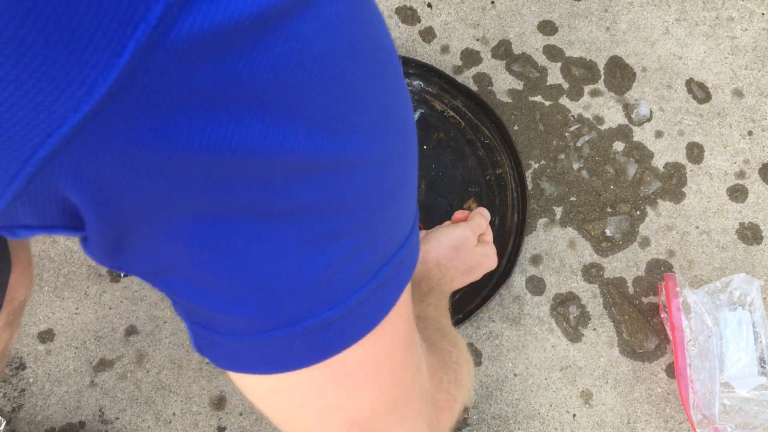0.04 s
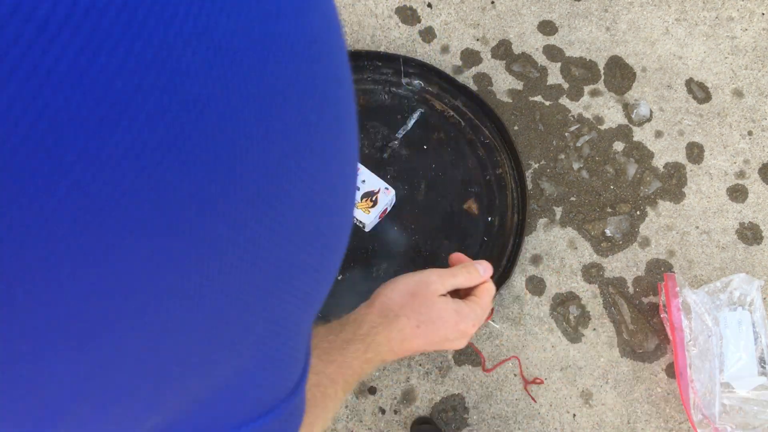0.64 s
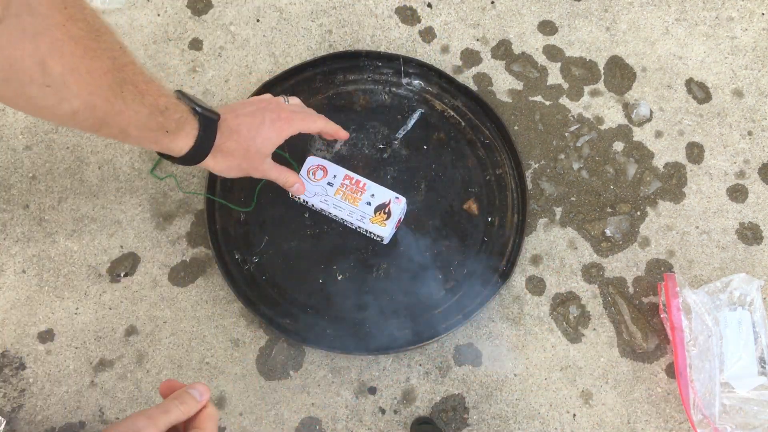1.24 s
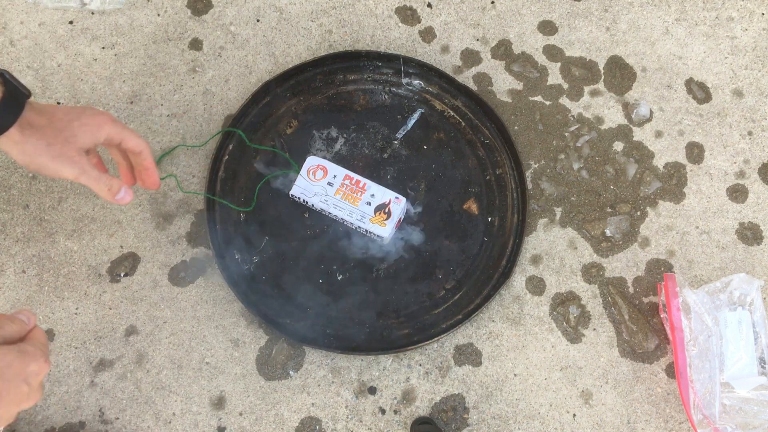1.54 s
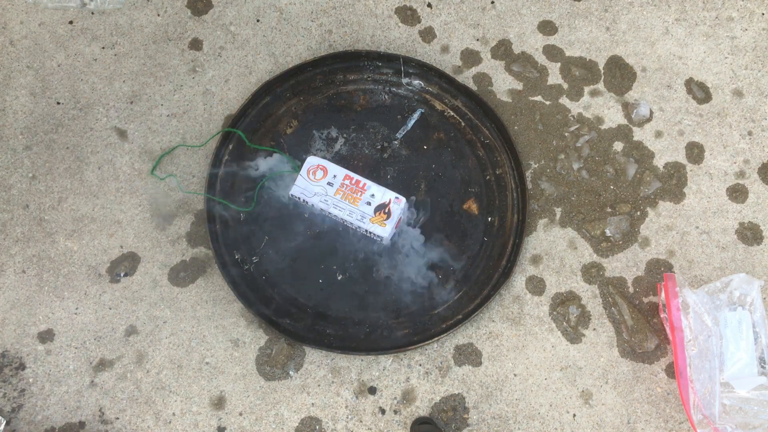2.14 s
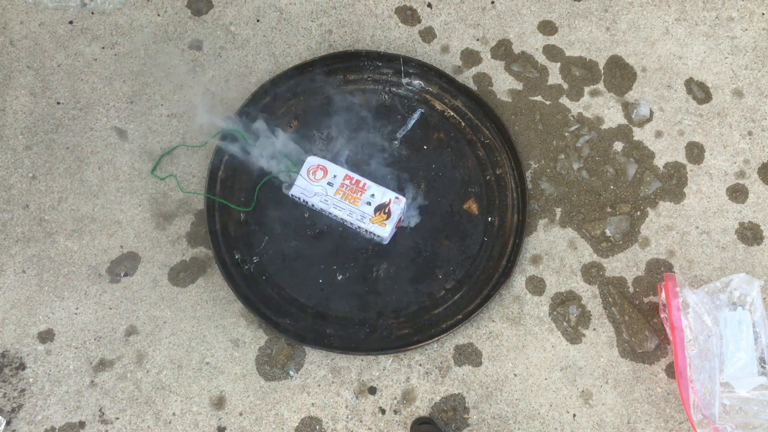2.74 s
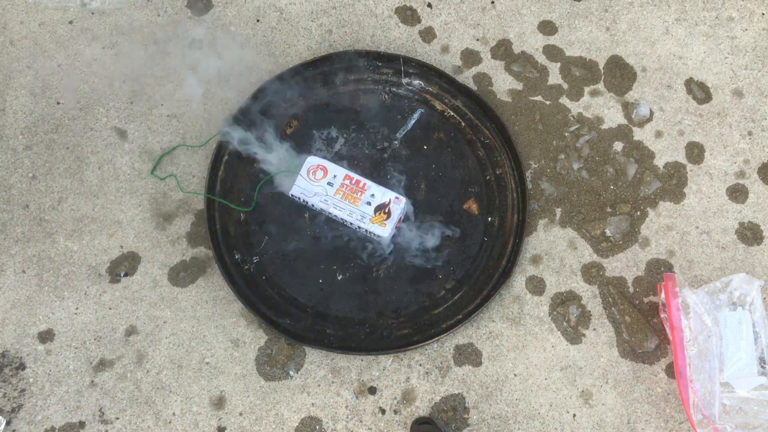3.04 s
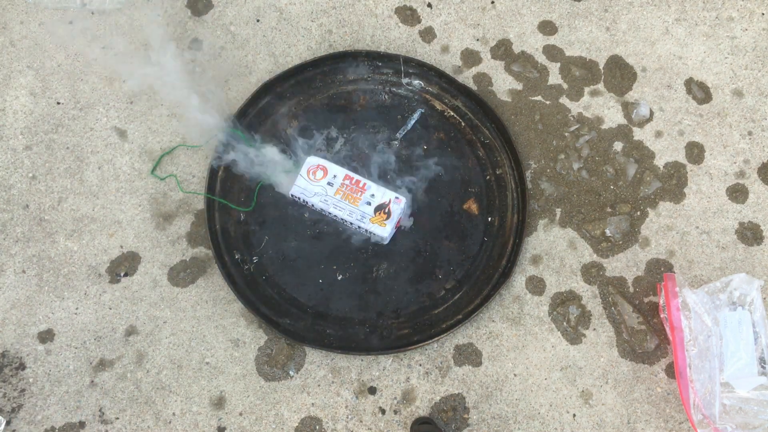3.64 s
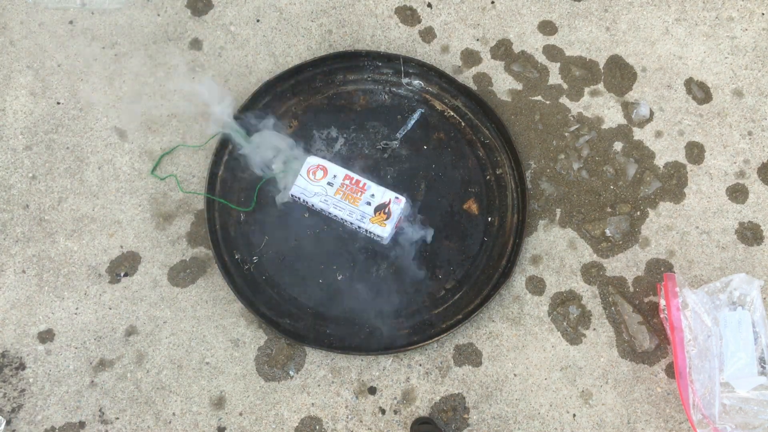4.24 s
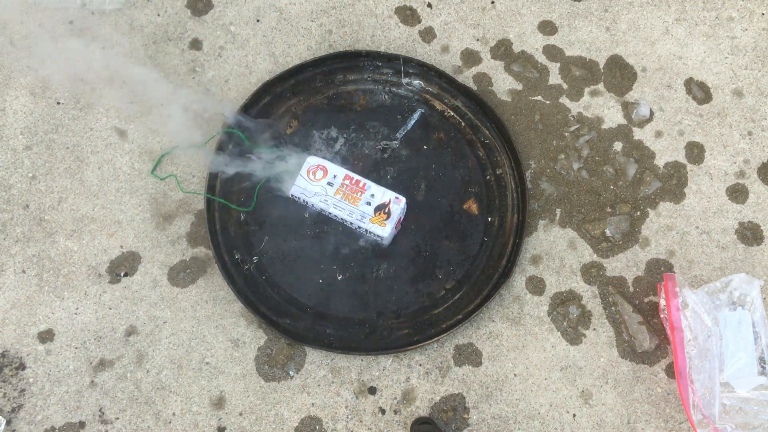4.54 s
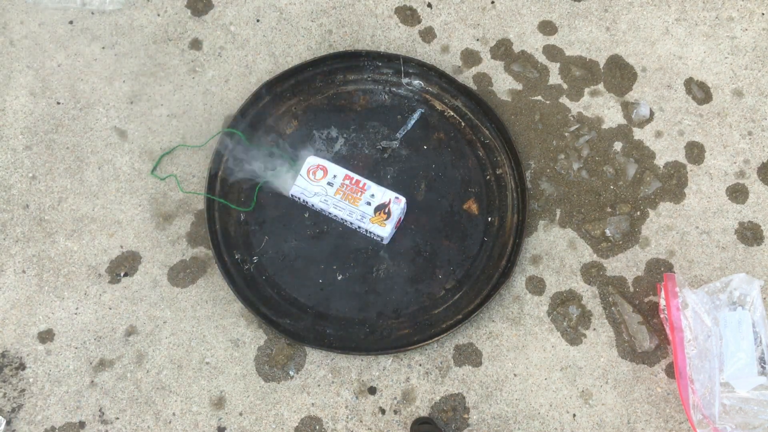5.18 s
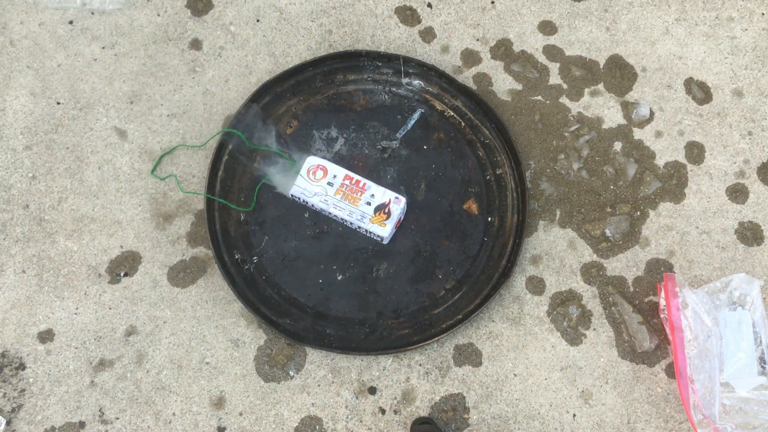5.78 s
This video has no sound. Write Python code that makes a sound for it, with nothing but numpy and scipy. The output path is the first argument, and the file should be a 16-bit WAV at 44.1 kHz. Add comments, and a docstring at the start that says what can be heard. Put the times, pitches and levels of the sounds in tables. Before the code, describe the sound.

A sleeve brushes by as a cord is pulled and a firestarter ignites with a sharp double snap. A bright, sputtering fizz follows for about a second, with light knocks on a steel tray. It gives way to a quieter, duller jet of smoke that hisses for several seconds and dies in a few tiny ticks. Outdoor air softly buffets the close microphone, and a far engine hums faintly at the end.

```python
"""A pull-cord firestarter

Outdoors, on a steel tray, a cord rips the igniter with a sharp double snap. The primer (the starter
charge) fizzes for a second while the box is set straight. Then the block blows a duller jet of smoke
that dies away in a few ticks. Air buffets the microphone, and near the end an engine hums far off."""
import sys
import numpy as np
from scipy import signal
from scipy.fft import rfft, irfft, next_fast_len
from scipy.io import wavfile
from scipy.ndimage import uniform_filter1d, map_coordinates

SR = 44100
rng = np.random.default_rng(int(sys.argv[2]) if len(sys.argv) > 2 else 0)


def unload_wav(signal):
    """Save mono or channel-first audio to the path in sys.argv[1] as 16-bit WAV at rate SR, clipped to [-1, 1]."""
    wavfile.write(
        sys.argv[1],
        SR,
        np.round(np.clip(np.atleast_2d(signal).T, -1, 1) * 32767).astype(np.int16),
    )


N = 265173
TIME = np.arange(N) / SR


def amp(db):
    """Turn decibels into a number to multiply by."""
    return 10 ** (np.asarray(db) / 20)


def unit(x):
    """Scale a signal to an average power of 1."""
    return x / np.sqrt(np.mean(x ** 2) + 1e-20)


def along(points, hz):
    """Read the level in dB at any pitch from a table; it falls steeply past both ends."""
    pitches, levels = np.transpose(points)
    octave, known = np.log2(hz + 1), np.log2(pitches)
    beyond = np.maximum(known[0] - octave, 0) + np.maximum(octave - known[-1], 0)
    return np.interp(octave, known, levels) - 24 * beyond


def curves(rows):
    """Join the rows with straight lines: one curve for each column after the time."""
    times, *columns = np.transpose(rows)
    return [np.interp(TIME, times, column) for column in columns]


def gate(start, end, rise, fall):
    """Fade in from start and out towards end, all in seconds."""
    return np.clip((TIME - start) / rise, 0, 1) * np.clip((end - TIME) / fall, 0, 1)


def swell(s, half):
    """A smooth bump of height 1 around time s."""
    return np.exp(-.5 * ((TIME - s) / half) ** 2)


def after(s):
    """Seconds since time s, 0 before it."""
    return np.maximum(TIME - s, 0)


def wobble(rate):
    """A smooth curve through `rate` random values a second."""
    return map_coordinates(rng.standard_normal(int(N * rate / SR) + 4), [TIME * rate])


def filtered(x, response):
    """Multiply each pitch in x by response(hz)."""
    size = next_fast_len(N + 8192)
    return irfft(rfft(x, size) * response(np.fft.rfftfreq(size, 1 / SR)), size)[:N]


def peak(hz, centre_hz, width_hz, boost_db):
    """The dB added by a resonance: a band of pitches that rings louder than the rest."""
    return boost_db / (1 + (2 * (hz - centre_hz) / width_hz) ** 2)


def noise(tone, rings=(), grain=0):
    """Noise shaped by a tone table and resonances; grain turns it into tiny uneven pops."""
    source = rng.standard_normal(N) * np.exp(grain * rng.standard_normal(N))
    return unit(filtered(source, lambda hz: amp(along(tone, hz) + sum(peak(hz, *r) for r in rings))))


def resonate(x, centre_hz, width_hz, boost_db):
    """A moving resonance that colours the sound without adding power."""
    hz, times, bands = signal.stft(x, SR, nperseg=1024)
    controls = [np.interp(times, TIME, c + np.zeros(N)) for c in (centre_hz, width_hz, boost_db)]
    gain = amp(peak(hz[:, None], *controls))
    power = np.mean(np.abs(bands) ** 2, axis=1)
    gain /= np.sqrt(power @ gain ** 2 / power.sum())
    return unit(signal.istft(bands * gain, nperseg=1024)[1][:N])


def drifting(x, depth_db):
    """Narrow bands of pitch slowly swell and fade as the burning channel changes."""
    bands = signal.stft(x, SR, nperseg=1024)[2]
    drift = uniform_filter1d(rng.standard_normal(bands.shape), size=4, axis=0)  # smooth over pitch
    drift = uniform_filter1d(drift, size=22, axis=1)  # and over time
    return unit(signal.istft(bands * amp(depth_db * unit(drift)), nperseg=1024)[1][:N])


def bursts(rows, tone, rings=()):
    """Sudden puffs of noise, each dropping 60 dB in its fade_s."""
    out = np.zeros(N)
    for start_s, level_db, fade_s, dull_hz in rows:
        age = after(start_s)
        puff = unit(filtered(noise(tone, rings), lambda hz: 1 / np.hypot(1, (hz / dull_hz) ** 2)))
        out += puff * amp(level_db - 60 * age / fade_s) * (1 - np.exp(-age / 0.00018))
    return out


# tone of the open air: pitch_hz, level_db
AIR_TONE = [(30, -10.5), (55, 2), (95, -10.5), (200, -16), (340, -6.5), (420, -17.5), (600, -13.5),
            (1100, -13), (2000, -21), (3000, -30), (4200, -32.5), (6000, -40), (9500, -43), (10500, -52),
            (12000, -46.5), (15700, -54.5)]
# notes in the engine's hum: pitch_hz, level_db
ENGINE_NOTES = [(122.5, -50.5), (243, -53), (288, -62.5), (362, -62.5), (500, -67)]


def outdoors():
    """Steady distant noise, and a far engine that swells at the end."""
    hum = np.zeros(N)
    for hz, db in ENGINE_NOTES:
        height = amp(db + 1.1 * wobble(6)) * np.sqrt(2)
        speed = 1 + 0.00705 * wobble(17)
        hum += height * np.sin(2 * np.pi * hz * np.cumsum(speed) / SR)
    return amp(-50) * noise(AIR_TONE) + hum * gate(5.0, 6.5, 0.59, .1)


# swirls of air on the microphone: time_s, level_db, half_length_s
GUSTS = [(1.37, -41, 0.013), (1.494, -41.5, 0.021), (1.961, -41, 0.024), (2.08, -28, 0.014),
         (2.586, -33.5, 0.011), (2.722, -34, 0.0084), (2.801, -33.5, 0.014), (3.02, -35, 0.041),
         (3.346, -34, 0.017), (3.56, -37, 0.0087), (4.146, -38, 0.044), (4.613, -47.5, 0.054),
         (4.713, -39, 0.015), (5.654, -43.5, 0.035), (5.975, -40, 0.023)]
# tones of the wind's low rumble and higher thump: pitch_hz, level_db
RUMBLE_TONE = [(15, -43), (25, -22), (45, -0.5), (65, 3), (120, -1), (300, -14), (430, -26), (500, -17),
               (650, -50), (1100, -120)]
THUMP_TONE = [(65, 0), (125, 1), (220, -2), (360, -6.5), (500, -17), (1000, -29)]
THUMP_DB, THUMP_HALF_S = -2, 0.0097  # thump compared with rumble, in a swirl this short


def wind():
    """A breeze and air pushed by the arm rumble on the microphone; quicker swirls thump more."""
    breeze = amp(-47.5 + 3 * wobble(14))
    arm_air = amp(-36 + 3.3 * wobble(16)) * gate(-.01, 1.116, 0.035, 0.2)
    swirls = sum(amp(db) * swell(s, half) for s, db, half in GUSTS)
    thumps = sum(amp(db + THUMP_DB) * THUMP_HALF_S / half * swell(s, half) for s, db, half in GUSTS)
    rumble = noise(RUMBLE_TONE) * np.sqrt(breeze ** 2 + arm_air ** 2 + swirls ** 2)
    return rumble + thumps * noise(THUMP_TONE)


# sweeps of the sleeve: peak_s, level_db, rise_s, fall_s
SLEEVE_SWEEPS = [(0.03, -36.5, 0.066, .05), (0.128, -32, 0.018, 0.035), (0.235, -30.5, 0.05, 0.092),
                 (0.502, -29, 0.056, 0.072), (0.6, -33, .05, 0.19)]
# tone of rubbing cloth: pitch_hz, level_db
CLOTH_TONE = [(80, -10), (180, 6), (330, 2.5), (520, -1.5), (800, -14.5), (1500, -51), (4000, -35.5)]


def sleeve():
    """Cloth brushes by as the arm pulls the cord and swings back."""
    power = sum(amp(db) ** 2 * np.exp(-2 * np.maximum((s - TIME) / rise, (TIME - s) / fall))
                for s, db, rise, fall in SLEEVE_SWEEPS)
    rustle = noise(CLOTH_TONE) * amp(3.1 * wobble(45.64))
    return rustle * np.sqrt(power) * gate(-0.013, 0.97, 0.0078, 0.3)


# bumps on the tray: start_s, level_db, fade_s, dull_above_hz
KNOCKS = [(0.382, -30, 0.047, 9000), (0.753, -24, 0.016, 3000), (0.7633, -20.5, 0.023, 3000),
          (0.867, -29.5, 0.15, 900), (0.918, -29.5, 0.044, 1600), (1.014, -19, 0.015, 7200),
          (1.24, -41, 0.74, 900), (1.344, -27, 0.014, 6000)]
# tone of the steel tray: pitch_hz, level_db
TRAY_TONE = [(150, -31), (400, -10), (650, 4), (1400, 3.5), (2500, -3), (5000, 2), (15000, -20)]


def tray_knocks():
    """The box and the hand knock on the tray."""
    return bursts(KNOCKS, TRAY_TONE)


# single small snaps: start_s, peak_db
TICKS = [(0.095, -42), (5.21, -45.5), (5.279, -43), (5.302, -47), (5.345, -42), (5.367, -42), (5.387, -46),
         (5.441, -38), (5.448, -48), (5.481, -45), (5.49, -38)]
# tone of the ticks and the embers' crackle: pitch_hz, level_db
TICK_TONE = [(1200, -19), (3000, 0.5), (5500, -0.5), (7500, -5), (9400, -1.5), (12000, -17), (15500, -24.5)]


def ticks():
    """The cord and the embers give tiny dry snaps."""
    # noise spikes above its average level, so it is set 11 dB under peak_db
    loudness = sum(amp(db - 11 - 60 * after(s) / 0.028) * (TIME >= s) for s, db in TICKS)
    return loudness * noise(TICK_TONE, grain=.4)


def embers():
    """The spent fuse crackles faintly and lets out one thin whistle."""
    whistle_hz = 4380 * (1 + .012 * wobble(400))
    whistle = amp(-63.5) * np.sin(2 * np.pi * np.cumsum(whistle_hz) / SR) * swell(5.4, 0.018)
    crackle = amp(-65.5) * noise(TICK_TONE, grain=1.1) * gate(5.24, 5.65, 0.066, 0.29)
    return whistle + crackle


# brief flares of the hiss, some with knocks on the tray: time_s, half_length_s, jet_db, fizz_db
HISS_FLARES = [(0.393, 0.015, 2.5, 6), (0.45, 0.015, 1, 3.5), (0.61, 0.041, 0, 5), (0.715, 0.038, 2.5, 5.5),
               (0.769, 0.0027, 3.5, 7), (1.017, 0.017, 2, 7.5), (1.342, 0.04, 0, 2), (4.2, 0.074, 1, 2.5),
               (4.566, 0.02, 1.5, 7)]


def hiss_flares():
    """The hiss gets louder for a moment: two curves of extra dB, for the jet and for the fizz."""
    return sum(np.outer([jet_db, fizz_db], swell(s, half)) for s, half, jet_db, fizz_db in HISS_FLARES)


# hoots from the hollow in the block: peak_s, pitch_hz, boost_db
HOOTS = [(1.99, 1840, 11.5), (2.341, 1640, 10)]
HOOT_HALF_S, HOOT_FALL_HZ_PER_S, HOOT_WIDTH_HZ = 0.056, 2600, 160


def hooting(roar):
    """Each hoot is a resonance of the hollow that swells, slides down and lifts the roar a little."""
    for s, hz, db in HOOTS:
        boost_db = db * swell(s, HOOT_HALF_S)
        sliding_hz = hz - HOOT_FALL_HZ_PER_S * (TIME - s)
        roar = resonate(roar, sliding_hz, HOOT_WIDTH_HZ, boost_db) * amp(0.22 * boost_db)
    return roar


# gas flowing from the block: time_s, roar_db
GAS_FLOW = [(1.42, -37.5), (1.6, -39), (1.85, -41.5), (2.05, -39.5), (3.0, -38.5), (3.85, -38.5),
            (4.42, -39.5), (4.64, -45), (5.05, -44.5), (5.25, -55.5)]
# rise and fall of the highest sizzle: time_s, change_db
SIZZLE_CHANGES = [(1.41, 6), (1.56, 1.5), (2.55, 0), (3.0, -4), (3.55, -3.5), (4.3, -3), (4.8, -1.5)]
# the vent's resonance as it burns open: time_s, pitch_hz, boost_db
VENT_RING = [(1.4, 5550, 8), (1.7, 5900, 11), (2.0, 3950, 1.5), (3.1, 3730, 4.5), (3.4, 4500, 3),
             (3.75, 4840, 9), (4.35, 5220, 13.5), (4.7, 4430, 1.5), (5.2, 4220, 17)]
# air ringing in the box and in the block's hollow: pitch_hz, width_hz, boost_db
BOX_AIR_RINGS = [(883, 46, 1.5), (1157, 210, 0), (1500, 135, 1.5), (1697, 39, 2.5), (1910, 130, 3),
                 (2440, 210, 1.5), (3535, 160, 3), (3860, 150, 3)]
HOLLOW_RINGS = [(1420, 170, 3), (1670, 63, 3)]
# tones of the smoke's four layers, low to high: pitch_hz, level_db
ROAR_TONE = [(150, -15), (400, -7.5), (750, -7.5), (1150, -1), (1320, -2.5), (1500, 1), (1800, -1.5),
             (2350, -1.5), (2580, -17), (3200, -21), (6000, -61)]
VENT_TONE = [(1800, -53), (2700, 2), (2950, -0.5), (3400, 3), (4000, 0), (4600, -2), (5100, -11),
             (5800, -9), (6500, -26), (9000, -47)]
SMOKE_FIZZ_TONE = [(4000, -13), (5600, 1.5), (6300, -1), (7000, 2), (7700, -4), (8400, 1), (9600, 0),
                   (10350, -8), (11100, -1.5), (11800, -6.5), (13000, -25)]
SIZZLE_TONE = [(10500, -25), (12000, -2), (12700, 0.5), (13500, -7), (14600, -3), (15700, -10)]
VENT_DB, SMOKE_FIZZ_DB, SIZZLE_DB = -44, -52.5, -60.5  # base levels
VENT_PER_FLOW, FIZZ_PER_FLOW, FIZZ_PER_SIZZLE = 0.37, 0.25, 0.36  # dB followed per dB of change
CLOGGED_DB, CLEAR_S, SAG_DB_PER_S = -2.5, 0.75, 0.81  # the vent starts clogged, clears, then weakens
FIZZ_OUT_S, FIZZ_OUT_DB_PER_S, SIZZLE_OUT_DB_PER_S = 4.93, 39, 74  # the highest sounds die first
VENT_OUT_S, VENT_OUT_DB_PER_S = 5.17, 106  # then the vent closes


def smoke():
    """Gas from the burning block roars in its hollow and hisses at the vent; one flow drives both."""
    roar_db, = curves(GAS_FLOW)
    change_db, = curves(SIZZLE_CHANGES)
    vent_hz, boost_db = curves(VENT_RING)
    jet_flare, fizz_flare = hiss_flares()
    flow_db = roar_db - roar_db.max()
    age, dying = after(PRIMER_END_S), after(FIZZ_OUT_S)
    opening_db = CLOGGED_DB * np.maximum(1 - age / CLEAR_S, 0) - SAG_DB_PER_S * age
    vent_db = VENT_DB + VENT_PER_FLOW * flow_db + opening_db - VENT_OUT_DB_PER_S * after(VENT_OUT_S)
    fizz_db = SMOKE_FIZZ_DB + FIZZ_PER_FLOW * flow_db + FIZZ_PER_SIZZLE * change_db
    fizz_db -= FIZZ_OUT_DB_PER_S * dying
    sizzle_db = SIZZLE_DB + change_db - SIZZLE_OUT_DB_PER_S * dying
    roar = hooting(noise(ROAR_TONE, BOX_AIR_RINGS + HOLLOW_RINGS)) * amp(roar_db + jet_flare)
    vent = resonate(noise(VENT_TONE, BOX_AIR_RINGS), vent_hz, vent_hz / 4.6, boost_db)
    vent *= amp(vent_db + jet_flare)
    fizz = drifting(noise(SMOKE_FIZZ_TONE, grain=0.47), depth_db=2.2) * amp(fizz_db + fizz_flare)
    sizzle = drifting(noise(SIZZLE_TONE, grain=.5), depth_db=3.5) * amp(sizzle_db + fizz_flare)
    hiss = (vent + fizz + sizzle) * gate(1.36, 5.31, 0.02, 0.11)
    return (roar * gate(1.255, 5.71, 0.14, 0.29) + hiss) * amp(0.66 * wobble(18))


# pressure in the primer, heard as loudness: time_s, jet_db
PRIMER_PRESSURE = [(0.38, -37.5), (0.47, -31.5), (0.73, -31), (0.79, -36), (0.94, -34), (1.13, -28.5),
                   (1.28, -33.5), (1.38, -31)]
# tones of the primer's jet and fizz: pitch_hz, level_db
JET_TONE = [(300, -19), (700, -15), (1300, -8.5), (1650, -1.5), (2100, -10.5), (2400, -8), (2700, -15),
            (3250, -4.5), (4400, -4.5), (5200, -10.5), (7000, -8.5), (9000, -46)]
PRIMER_FIZZ_TONE = [(3500, -34), (5000, -9), (5800, -5.5), (6900, -10.5), (7700, -5.5), (8400, -0.5),
                    (9400, 0.5), (10400, -5), (11200, -0.5), (13000, -4), (14500, -4), (15700, -9)]
# the cord hole's resonance as it chars and changes shape: time_s, pitch_hz, width_hz, boost_db
HOLE_RING = [(.37, 3720, 450, 6), (.55, 4080, 480, 7), (.82, 3500, 500, 6), (0.95, 3740, 1210, 1),
             (1.13, 4000, 1620, 12), (1.24, 3280, 600, 5), (1.31, 4770, 1810, 11.5)]
# its upper resonance: time_s, pitch_hz, boost_db
HOLE_UPPER_RING = [(.45, 9300, 0.5), (.68, 9700, 5), (.74, 5500, 5), (1.0, 5800, 3), (1.18, 6000, 11),
                   (1.25, 9250, -10), (1.32, 11600, 4)]
PRIMER_START_S, PRIMER_END_S, UPPER_WIDTH_HZ = 0.374, 1.405, 1300
PRIMER_FIZZ_DB, FIZZ_PER_JET = -36.5, 0.41  # fizz at average pressure; its dB per dB of jet


def primer():
    """The primer smoulders, catches and spits a bright, sputtering jet through the narrow cord hole."""
    jet_db, = curves(PRIMER_PRESSURE)
    upper_hz, upper_db = curves(HOLE_UPPER_RING)
    jet_flare, fizz_flare = hiss_flares()
    sputter = amp(0.84 * wobble(70))
    burning = gate(PRIMER_START_S, PRIMER_END_S, rise=0.0089, fall=0.042)
    smoulder = amp(-45) * gate(0.28, 0.39, 0.12, 0.01)
    fizz_db = PRIMER_FIZZ_DB + FIZZ_PER_JET * (jet_db - np.mean(PRIMER_PRESSURE, axis=0)[1])
    jet = resonate(noise(JET_TONE, BOX_AIR_RINGS, grain=0.16), *curves(HOLE_RING))
    fizz = resonate(noise(PRIMER_FIZZ_TONE, grain=0.6), upper_hz, UPPER_WIDTH_HZ, upper_db)
    fizz = drifting(fizz, depth_db=1.5)
    hiss = jet * amp(jet_db + jet_flare) + fizz * amp(fizz_db + fizz_flare)
    return (hiss * burning + (jet + amp(-4) * fizz) * smoulder) * sputter


# rips of the cord, then cracks of the charge: start_s, level_db, fade_s, dull_above_hz
CORD_RIPS = [(0.2188, -12, 0.036, 2600), (0.2218, -18.5, 0.038, 6850)]
CHARGE_CRACKS = [(0.2348, -10, 0.028, 8000), (0.2382, -11.5, 0.027, 9000), (0.2412, -13, 0.085, 12000)]
# tones of the striker and the bursting box: pitch_hz, level_db
STRIKER_TONE = [(200, -29.5), (900, -20), (1450, -21), (1730, 7), (2000, -1), (2400, -4.5), (3000, -29),
                (3900, -6), (5000, -16.5), (15000, -13.5)]
BOX_TONE = [(150, -18), (450, -12.5), (800, -4), (1300, -8), (2000, -5), (2650, -17), (3400, -8),
            (5200, -14.5), (7500, -15.5), (10000, -10), (13000, -13), (15700, -14)]
# resonances of the box: pitch_hz, width_hz, boost_db
BOX_RINGS = [(330, 72, 10), (840, 46, 4), (1164, 96, 8.5), (1700, 98, 3), (1960, 120, 6), (3250, 120, 14),
             (4110, 100, 9), (4420, 100, -1), (5950, 150, 10.5), (9700, 400, 2.5)]


def igniter():
    """The cord tears through the striker, the charge cracks and rings the box; the yard answers."""
    rip = bursts(CORD_RIPS, STRIKER_TONE)
    crack = bursts(CHARGE_CRACKS, BOX_TONE, BOX_RINGS)
    yard_echo = bursts([(0.245, -38.5, 0.37, 6000)], BOX_TONE)
    return rip + crack + yard_echo


# echoes from the ground, body and walls: delay_s, gain
ECHOES = [(.00342, .13), (.00354, .14), (.0064, .08), (.0093, .08), (0.0141, .08), (0.0174, .08)]


def reflected(x):
    """Nearby surfaces add weak late copies, which lift some pitches and weaken others."""
    def response(hz):
        return 1 + sum(gain * np.exp(-2j * np.pi * hz * delay) for delay, gain in ECHOES)
    power = 1 + sum(gain ** 2 for _, gain in ECHOES)
    return filtered(x, response) / np.sqrt(power)


def scene():
    """Mix the firestarter and its echoes with the background, in one channel."""
    firestarter = igniter() + primer() + smoke() + embers() + ticks() + tray_knocks()
    return (reflected(firestarter) + wind() + sleeve() + outdoors())[None]


def record(dry):
    """Cut off the very highest treble."""
    return filtered(dry[0], lambda hz: hz < 15850)[None]


dry = scene()
out = record(dry)
unload_wav(out)
```